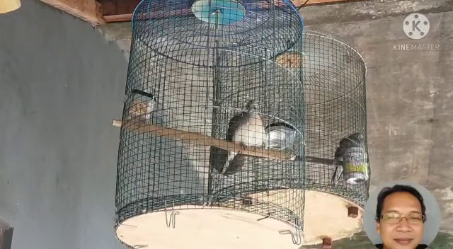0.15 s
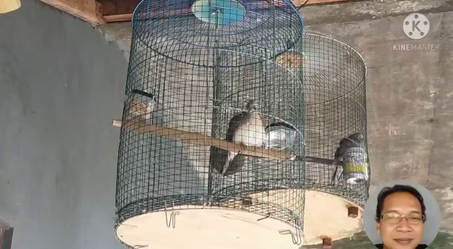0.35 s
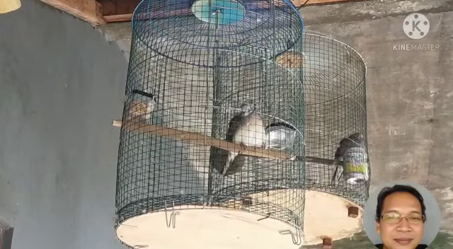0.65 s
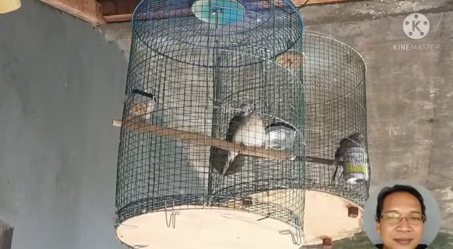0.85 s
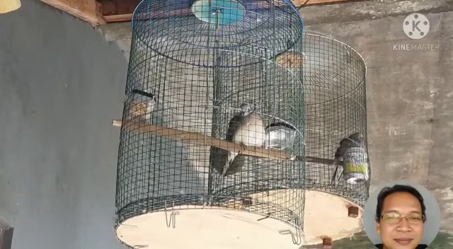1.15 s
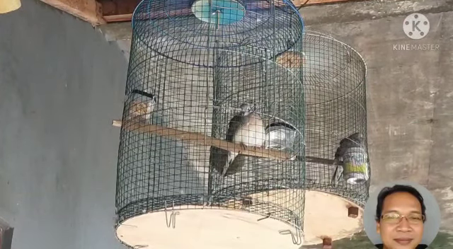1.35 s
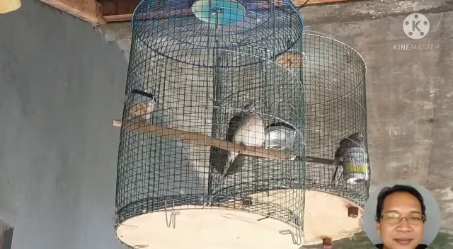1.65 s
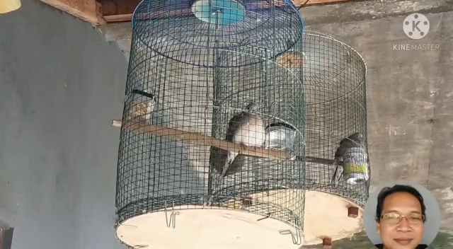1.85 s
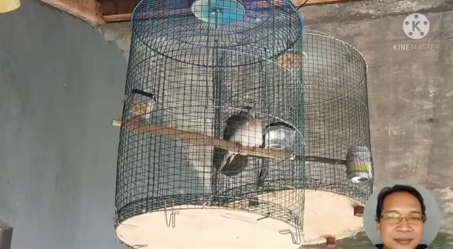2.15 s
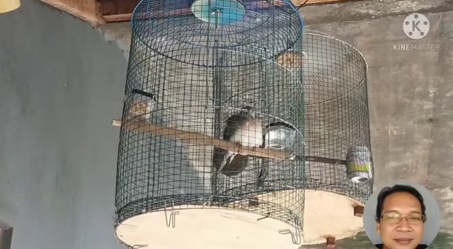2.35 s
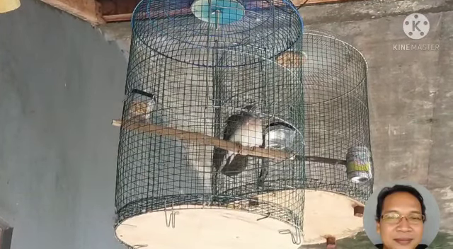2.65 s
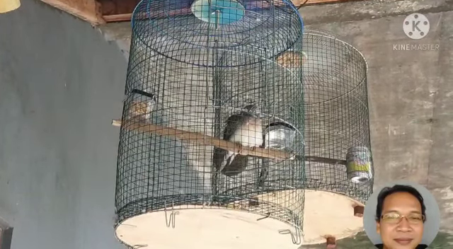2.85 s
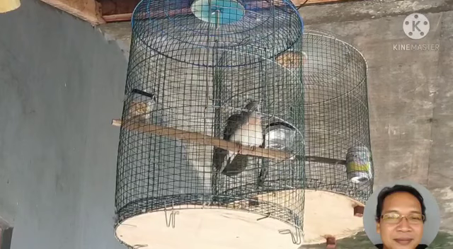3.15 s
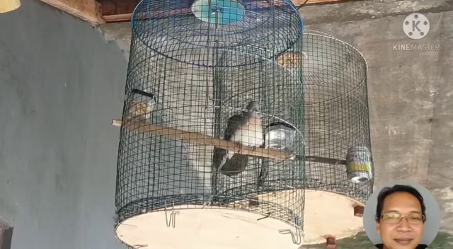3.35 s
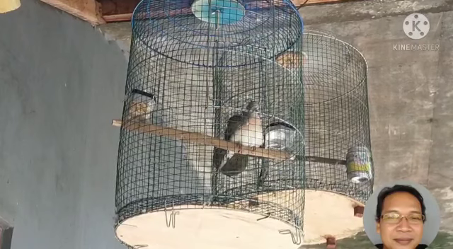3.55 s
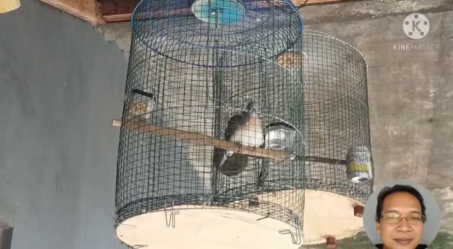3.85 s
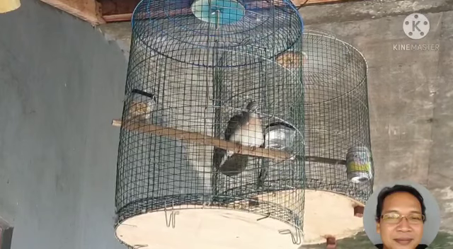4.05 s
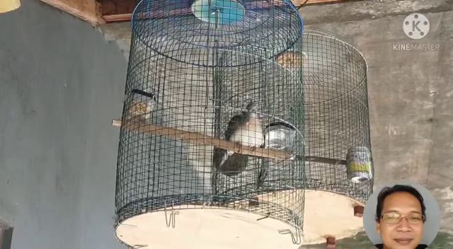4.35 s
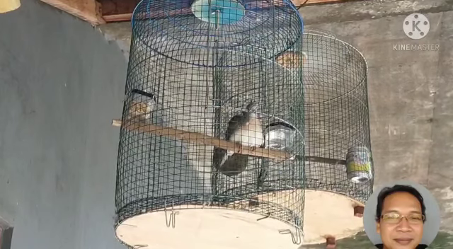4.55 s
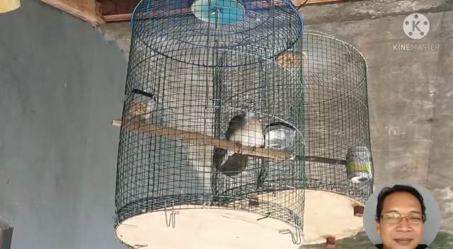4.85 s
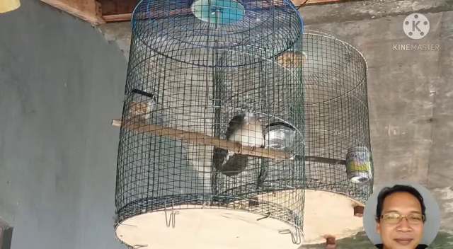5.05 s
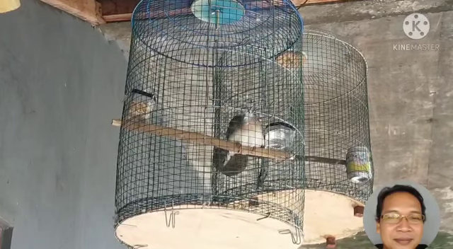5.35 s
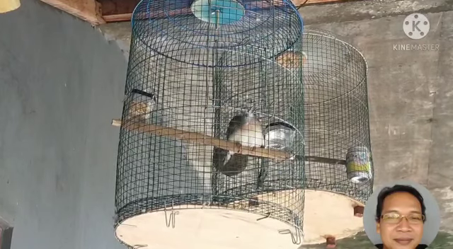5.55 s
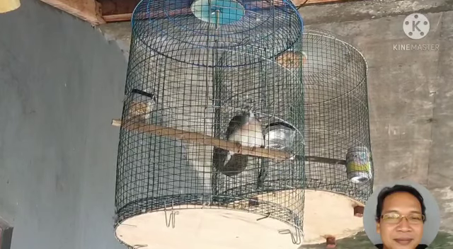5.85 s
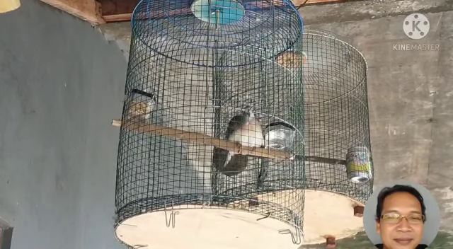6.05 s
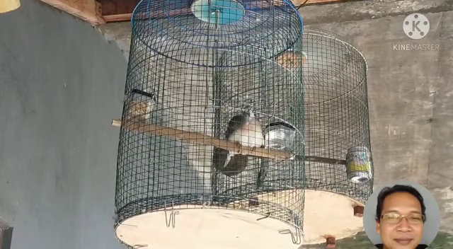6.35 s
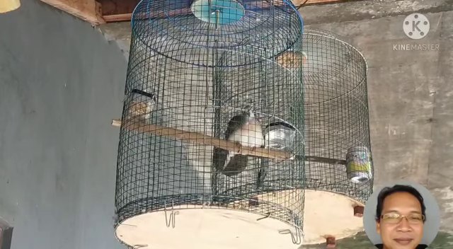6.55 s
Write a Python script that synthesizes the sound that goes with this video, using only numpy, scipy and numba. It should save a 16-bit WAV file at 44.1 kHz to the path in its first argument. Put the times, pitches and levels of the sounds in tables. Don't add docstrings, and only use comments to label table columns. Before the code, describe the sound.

A caged dove close by stutters, pauses, then sings a run of swelling coos and a fluttery flourish, over claw ticks, faint insects and low hum.

```python
import sys
import numpy as np
from scipy import signal
from scipy.fft import rfft, irfft, next_fast_len
from scipy.io import wavfile
from scipy.ndimage import uniform_filter1d
from numba import njit

SR = 44100
rng = np.random.default_rng(int(sys.argv[2]) if len(sys.argv) > 2 else 0)


def to_wav(s):
    ch = np.atleast_2d(s).T
    pcm = np.round(np.clip(ch, -1, 1) * 32767)
    wavfile.write(sys.argv[1], SR, pcm.astype(np.int16))


def ratio(d):
    e = np.asarray(d, float) / 20
    return 10 ** e


N = 295029
T = np.arange(N) / SR
CHANGE_S = 2.169


def level(x, db):
    return x * ratio(db) / np.sqrt(np.mean(x ** 2))


def shape(points, hz):
    point_hz, db = np.transpose(points)
    return ratio(np.interp(np.log(np.maximum(hz, 1)), np.log(point_hz), db))


def colour(x, points):
    size = next_fast_len(len(x), True)
    hz = np.arange(size // 2 + 1) * SR / size
    return irfft(rfft(x, size) * shape(points, hz), size)[:len(x)]


def noise(points):
    return colour(rng.standard_normal(N), points)


def walk(rate):
    hold = int(SR / rate)
    steps = np.repeat(rng.standard_normal(N // hold + 1), hold)
    return 1.3 * uniform_filter1d(uniform_filter1d(steps, hold), hold)[:N]


def wave(hz):
    return np.sin(2 * np.pi * np.cumsum(hz) / SR)


def distance(x, direct_db, t60_s):
    t = np.arange(SR // 2) / SR
    scatter = rng.standard_normal(len(t)) * ratio(-60 * t / t60_s)
    scatter /= np.sqrt(np.sum(scatter ** 2))
    scatter[0] = ratio(direct_db)
    first = T < CHANGE_S
    early = signal.fftconvolve(x * first, scatter)[:N] * first
    return early + signal.fftconvolve(x * ~first, scatter)[:N]


def arch(table, sag_hz=0, sag_hz_per_s=0, start_hz=None):
    rows = []
    for s, length, *rest in table:
        top, db = rest[-2:]
        end = top - sag_hz - sag_hz_per_s * length
        rows.append((s, length, start_hz or rest[0], top, end, db))
    return rows


def sink(table):
    return [(s, length, a, a, b, db) for s, length, a, b, db in table]


def pure(k, hz):
    return 1


# pitch_hz, level_db
POUCH = [(550, -24), (800, -6.5), (950, 6), (1100, 4.5), (1300, -5)]
# pitch_hz, level_db
THROAT = [(1600, -21.5), (1900, -24.5), (2300, -27), (3000, -27), (3400, -36.5), (3600, -25.5), (4600, -64),
          (5400, -40.5), (5800, -41.5), (6150, -28.5), (6500, -40), (6800, -51), (8000, -41.5),
          (9500, -63.5)]


def voice(k, hz):
    return shape(POUCH if k == 1 else THROAT, k * hz)


def notes(table, throat, bend, curve, swell, late, wobble, count=1, bright_db=0, growth=0.5):
    edge_s = 0.0044
    hz, gain, effort = np.full(N, 1000.), np.zeros(N), np.zeros(N)
    for s, length, start, top, end, db in table:
        on = (T >= s) & (T < s + length)
        u = (T[on] - s) / length
        rise = np.clip(1 - u / bend, 0, 1)
        fall = np.clip((u - bend) / (1 - bend), 0, 1)
        hz[on] = top - (top - start) * rise ** curve - (top - end) * fall ** curve
        effort[on] = np.abs(np.sin(np.pi * u ** late))
        edge = np.clip(np.minimum(u, 1 - u) * length / edge_s, 0, 1)
        gain[on] = ratio(db) * np.sqrt(2) * effort[on] ** swell * np.sin(np.pi / 2 * edge) ** 2
    on = gain > 0
    flicker = ratio(4.5 * walk(90))[on]
    opening = ratio(bright_db + 0 * T)[on] * (effort[on] + 0.056) ** growth * flicker
    phase = 2 * np.pi * np.cumsum(hz * (1 + wobble * walk(60)))[on] / SR
    tone = 0
    for k in range(1, count + 1):
        tone = tone + throat(k, hz[on]) * (opening if k > 1 else 1) * np.sin(k * phase)
    gain[on] *= tone
    return gain


# start_s, length_s, start_hz, top_hz, level_db
STUTTERS = [
    (-.016, 0.042, 1160, 1166, -33),
    (.024, 0.04, 1045, 1137, -31.5),
    (.064, 0.021, 1113, 1137, -32),
    (.087, 0.02, 1090, 1110, -32.5),
    (.111, 0.047, 850, 1094, -31.5),
    (.169, .011, 955, 946, -38),
    (.179, 0.0332, 850, 1064, -31.5),
    (.257, 0.094, 802, 1120, -32.5),
    (2.133, 0.012, 1041, 1055, -49.5),
    (2.147, 0.14, 787, 1186, -34.5),
]


def stutters():
    rows = arch(STUTTERS, sag_hz=24.7, sag_hz_per_s=1897)
    return notes(rows, voice, count=8, bend=0.345, curve=3, swell=0.46, late=0.75, wobble=0.00585,
                 bright_db=-2.5, growth=0.24)


# start_s, length_s, top_hz, level_db
HUMS = [(0, 0.41, 650, -71), (.41, .07, 469.2, -69), (0.511, 0.091, 636, -70.5), (.57, .13, 502.3, -69),
        (0.635, .11, 615, -72.5), (.77, 0.93, 503, -71), (0.801, .12, 615, -75), (1.533, .15, 478.8, -69.5),
        (2.069, 0.061, 660.6, -65), (2.363, .072, 415, -67), (4.399, 0.28, 642, -90),
        (4.786, 0.15, 842, -65), (5.296, 2.3, 648.5, -69), (5.05, 0.22, 854, -62)]


def hums():
    rows = [(s, length, 0.85 * hz, hz, 0.96 * hz, db) for s, length, hz, db in HUMS]
    out = sum(notes(rows[k::2], pure, bend=0.27, curve=2.2, swell=0.29, late=0.69, wobble=0.0026)
              for k in range(2))
    return ratio(-9.5) * distance(out, direct_db=8, t60_s=0.45)


def air(points, db):
    out = 0
    for hz in 22 * 2. ** np.arange(10):
        band = noise([(hz / 2, -60), (hz / 1.6, -6), (hz, 0), (hz * 1.6, -6), (hz * 2, -60)])
        out = out + band * ratio(0.68 * walk(2.185) + 2.1 * walk(14))
    out = out + noise([(11000, -60), (15000, -2), (20000, 0)])
    return level(colour(out, points), db)


# time_s, level_db
RUSTLE = [(0.0, -70), (0.2, -62), (0.26, -65.5), (0.57, -70.5), (0.709, -69.5), (0.88, -73.5), (1.74, -84),
          (1.94, -95), (2.16, -91)]


def rustle():
    s, db = np.transpose(RUSTLE)
    hiss = noise([(9000, -10.5), (12500, -15.5), (14800, -1), (15400, -15.5), (16200, -36.5)])
    return level(hiss, -4.5) * ratio(np.interp(T, s, db) + 2.0 * walk(58))


# pitch_hz, level_db
ENGINES = [(53, -70), (79, -67.5), (127, -67.5)]


def drones():
    return sum(ratio(db + 4.0 * walk(6.7)) * wave(hz * (1 + 0.067 * walk(2.0))) for hz, db in ENGINES)


# (under 9 kHz, against the peak)
TICKS = [(0.108, -61, -20), (0.149, -45, -7.5), (0.169, -49, -10), (0.2, -45, -3.5), (0.2364, -35.5, -10),
         (0.507, -39.5, -18), (0.5593, -46, -12), (0.621, -47.5, -8.5), (0.7188, -41, -22),
         (0.771, -40.5, -11), (0.8425, -53, -7), (0.877, -57, -1), (0.954, -53, -2), (1.231, -48.5, -5),
         (1.4793, -65, -2), (1.616, -52.5, -9), (1.7213, -66, -12), (1.7497, -60, -8), (1.8593, -57, -13),
         (1.982, -47, -10), (2.154, -60, -17.5),
         (2.326, -43, -1), (2.5094, -58.5, -3.5), (2.708, -48, -15), (2.7364, -57, -8),
               (3.3799, -17.5, -10.5), (3.3855, -38, 5), (3.487, -35, -11), (4.002, -36.5, -2.5),
               (4.469, -43, -6), (4.6487, -43, 3.5), (4.741, -32.5, -15.5), (4.771, -42.5, 4),
               (5.3825, -40.5, -2), (5.938, -52, -9), (6.4394, -48, 1), (6.479, -44, -11)]


def ticks():
    t = np.arange(SR // 20) / SR
    tail = np.exp(-t / .0011) + ratio(-22) * np.exp(-t / .01)
    bright, dull = np.zeros(N + len(t)), np.zeros(N + len(t))
    for s, db, dull_db in TICKS:
        i = int(s * SR)
        crack = tail * rng.standard_normal(len(t))
        crack *= ratio(db + 4.0) / np.sqrt(np.sum(crack ** 2) / np.sum(tail ** 2))
        bright[i:i + len(t)] += crack
        dull[i:i + len(t)] += crack * ratio(dull_db)
    top = colour(bright[:N], [(8000, -24.5), (11000, -12.5), (14000, -3.5), (15100, 12.5), (15600, -11.5),
                              (16300, -20.5), (16600, -56.5)])
    return top + colour(dull[:N], [(1500, -13.5), (4000, -18), (6000, -12.5), (8200, 0.5), (10000, -16.5),
                                   (12000, -28.0)])


# middle_s, half_length_s, pitch_hz, level_db
RUMBLES = [
    (0.209, 0.46, 136.2, -60.5),
    (1.152, 0.17, 140, -61.5),
    (5.8, .15, 79.2, -58),
    (6.35, 0.27, 79, -56.5),
]


def rumbles():
    out = 0
    for s, half, hz, db in RUMBLES:
        swell = ratio(db + 2.4 * walk(13)) * np.exp(-((T - s) / half) ** 2)
        out = out + swell * wave(hz * (1 + 0.0503 * walk(8)))
    return out


# start_s, length_s, top_hz, level_db
FAR_COOS = [
    (1.003, 0.16, 1219, -53),
    (1.889, .16, 1194, -57),
    (2.391, .17, 1358, -47),
    (2.555, 0.04, 1214, -53),
]
# start_s, length_s, from_hz, to_hz, level_db
FAR_SINKING = [
    (1.16, 0.08, 995, 970, -63),
    (1.355, 0.31, 1042, 905, -71.5),
    (2.385, 0.021, 1540, 1450, -58),
]


def far_doves():
    start_hz = 959
    coos = notes(arch(FAR_COOS, sag_hz=170.9, start_hz=start_hz), pure, bend=0.1353, curve=1.4,
                 swell=0.17, late=0.2, wobble=0.00924)
    lead_in = [(s, 0.03225, start_hz, 0.68 * top, 0.68 * top, db - 2.5) for s, _, top, db in FAR_COOS[:-1]]
    lead_in = notes(lead_in, pure, bend=0.56, curve=0.93, swell=0.29, late=0.8, wobble=0.0084)
    trail = notes(sink(FAR_SINKING), pure, bend=.05, curve=1.2, swell=0.25, late=0.4, wobble=.008)
    return ratio(4.5) * distance(coos + lead_in + trail, direct_db=-9, t60_s=0.45)


# start_s, length_s, from_hz, to_hz, level_db
WHISTLES = [
    (1.25, 0.39, 3385, 2994, -72),
    (1.75, 0.12, 3524, 3430, -71),
    (2.505, 0.028, 2444, 2113, -52),
    (6.25, 0.54, 2765, 2670, -65.5),
]


def whistles():
    out = notes(sink(WHISTLES), pure, bend=.2, curve=1.2, swell=.5, late=1, wobble=0.004)
    return ratio(4.5 - 11) * distance(out, direct_db=-9, t60_s=0.45)


# pitch_hz, level_db
CHORUS = [(10000, -70), (11800, -32), (12500, -17), (13100, -11), (13400, -6), (13680, 0), (13950, -6),
          (14300, -12), (15150, -15), (15300, -28), (15550, -60)]
# first_crest_s, phrase_period_s, crest_hz, wing_stroke_hz
SINGERS = [
    (.55, 1.975, 13362, 270),
    (.55, 1.9, 13755, 300),
    (1.52, 1.83, 13860, 245),
]
# time_from_crest_s, offset_from_crest_hz
PHRASES = [
    [(-.73, -110), (0, 0), (1.3, -210)],
    [(-.9, -160), (0, 0), (.97, -255), (1.32, -210)],
    [(-.66, -170), (0, 0), (.55, -155), (1.3, -300)],
]
# line_db; sidebands one below, one above, two above (db against line); undertones_db
SINGER_DB = [(-49, -19, -3.5, -12, -52.5), (-41, -10.5, -17, -21.5, -48.5), (-43.5, -17, -10, -19, -50)]
# share_of_main_pitch, level_db; the last row is the main line itself
UNDERTONES = [(1 / 4, -14.5), (1 / 3, -29.5), (1 / 2, -21), (3 / 4, -28), (1, 0)]
# time_s, pitch_hz, level_db
RASP = [
    (4.25, 13830, -56),
    (4.33, 13830, -43),
    (4.55, 13690, -39),
    (4.8, 13200, -42),
    (4.9, 13140, -56),
]


def insects():
    out = level(noise(CHORUS), -50.5) * ratio(1.2 * walk(6))
    for (crest, period, top, stroke), phrase, (db, *sides, under_db) in zip(SINGERS, PHRASES, SINGER_DB):
        after, bend = np.transpose(phrase)
        for k in range(4):
            s = crest + period * k + after
            on = (T > max(s[0], CHANGE_S)) & (T < s[-1])
            pitch = uniform_filter1d(np.interp(T, s, top + bend), size=SR // 6)
            clean = 2 * np.pi * np.cumsum((pitch + 7 * walk(30))[on]) / SR
            phase = 2 * np.pi * np.cumsum((pitch + 9 * walk(30))[on]) / SR
            fade = np.clip(np.minimum(T - s[0], s[-1] - T) / .1, 0, 1)[on]
            line = np.sin(phase) * ratio(4.5 * walk(28))[on]
            for order, side_db in zip((-1, 1, 2), sides):
                side = np.sin(phase + 2 * np.pi * order * stroke * T[on])
                line = line + ratio(side_db + 4 * walk(28))[on] * side
            under = sum(ratio(d) * np.sin(share * clean) for share, d in UNDERTONES[:-1])
            under = under * ratio(4 * walk(20))[on]
            out[on] += fade * (ratio(db) * line + ratio(under_db) * under)
    s, hz, db = np.transpose(RASP)
    rasp = walk(240) * wave(np.interp(T, s, hz))
    return out + ratio(np.interp(T, s, db, left=-120, right=-120)) * rasp


# start_s, length_s, start_hz, top_hz, level_db
OPENING = [
    (3.10, 0.17, 558.5, 1176, -28),
]
FLARE = [
    (3.108, 0.0407, 1106, 1885, -45.5),
]
SCOOP = [
    (3.108, 0.06, 556, 980, -48.5),
]


def opening_call():
    call = notes(arch(OPENING), voice, count=8, bend=0.92, curve=2.2, swell=0.67, late=4.9, wobble=0.0025,
                 bright_db=-5)
    flare = notes(arch(FLARE), pure, bend=0.96, curve=0.94, swell=0.33, late=0.29, wobble=0.0077)
    scoop = notes(arch(SCOOP), pure, bend=0.8, curve=1.17, swell=0.26, late=2.1, wobble=0.00355)
    return call + flare + scoop


# middle_s, half_length_s, level_db
PASSING = (3.3, 0.27, -54.5)


def passing():
    s, half, db = PASSING
    road = noise([(150, -27), (300, -16.0), (600, -5.5), (900, 4.0), (1600, -1.0), (2200, -29)])
    return level(road, db) * np.exp(-((T - s) / half) ** 2)


# pitch_hz, level_db
COO_POUCH = [(700, -16), (920, -9), (1030, -13), (1105, 1), (1300, 0)]


def round_voice(k, hz):
    return shape(COO_POUCH if k == 1 else THROAT, k * hz)


# start_s, length_s, top_hz, level_db
COOS = [(3.335, 0.031, 1070, -32), (3.39, .04, 1117, -39.5), (3.452, 0.041, 1079, -32.5),
        (3.525, 0.042, 1144, -37), (3.605, 0.044, 1118, -35), (3.7, 0.037, 1155, -28),
        (3.80, .11, 1181, -28), (4.0, 0.13, 1160, -28), (4.21, .15, 1142, -31), (4.435, 0.15, 1134, -31.5),
        (4.668, 0.17, 1118, -33), (4.915, 0.16, 1120, -34), (5.155, 0.17, 1115, -34)]
# time_s, overtones_db
COO_OPENING = [(3.75, -11), (3.85, -7), (4.1, -9), (4.45, -3), (5.3, -2)]


def coos():
    return notes(arch(COOS, sag_hz=56.6, start_hz=844), round_voice, count=8, bend=0.44, curve=2.5,
                 swell=0.42, late=0.93, wobble=0.00207,
                 bright_db=np.interp(T, *np.transpose(COO_OPENING)), growth=-0.19)


# start_s, length_s, start_hz, top_hz, level_db
NEIGHBOUR = [
    (3.42, 0.1225, 1171, 1377, -39),
    (3.53, .056, 1195, 1261, -34.5),
]


def neighbour():
    return notes(arch(NEIGHBOUR, sag_hz_per_s=1500), pure, bend=.35, curve=1.703, swell=0.22, late=0.48,
                 wobble=0.0055)


# time_s, level_db
CHEEP_EFFORT = [(3.64, -77), (3.85, -71.5), (4.3, -67.5), (5.2, -68.5), (5.8, -69.5), (6.15, -68)]
# start_s, level_db
CHEEPS_DOWN = [(4.392, -60), (4.63, -61), (4.871, -63.5), (5.47, -62), (5.88, -64), (6.441, -66.5)]


def cheeps():
    beats = 3.645 + .1925 * np.arange(14)
    effort_db = np.interp(beats, *np.transpose(CHEEP_EFFORT))
    up = [(s, .055, 2350, 3750, 3700, db + 15.5) for s, db in zip(beats, effort_db)]
    up = notes(up, pure, bend=0.87, curve=0.87, swell=0.13, late=1, wobble=0.01198)
    down = [(s, .11, 5500, 5550, 3400, db + 5.0) for s, db in CHEEPS_DOWN]
    down = notes(down, pure, bend=0.031, curve=0.64, swell=0.21, late=1, wobble=0.01265)
    return distance(up + down, direct_db=-24, t60_s=1.05)


# start_s, length_s, start_hz, top_hz, level_db
FLOURISH = [
    (5.346, 0.023, 695, 796, -47),
    (5.368, 0.058, 799, 1215, -33.5),
    (5.428, .038, 1105, 1183, -33.5),
    (5.467, 0.04, 1033, 1150, -33),
    (5.522, 0.041, 876, 1083, -34.5),
    (5.591, 0.031, 843, 1070, -34.5),
    (5.652, 0.0244, 856, 993, -41.5),
    (5.677, 0.11, 850, 1163, -35),
    (5.864, 0.1, 813, 1177, -36.5),
]


def flourish():
    flutter = 1 + .42 * wave(72 * (1 + .2 * walk(30)))
    rows = arch(FLOURISH, sag_hz=15.2, sag_hz_per_s=2400)
    return flutter * notes(rows, voice, count=8, bend=.46, curve=2.5, swell=0.39, late=0.85,
                           wobble=0.0035, bright_db=7.0)


@njit
def walls(x, lags, gain, damp):
    line, soft, out = np.zeros((8, 4096)), np.zeros(8), np.zeros(len(x))
    for i in range(len(x)):
        total = 0.
        for k in range(8):
            soft[k] += (1 - damp) * (gain[k] * line[k, (i - lags[k]) & 4095] - soft[k])
            total += soft[k]
            out[i] += soft[k] * (1 - 2 * (k % 2))
        for k in range(8):
            line[k, i & 4095] = x[i] + 1e-18 + soft[k] - total / 4
    return out


# delay_s, level_db
ECHOES = [(0.0125, -9), (.03125, -9), (0.059, -17), (0.088, -12)]


def yard_ring(sent, wet_db, scale):
    lags = np.array([709, 953, 1237, 1531, 1823, 2179, 2549, 2903])
    ring = walls(sent, lags, ratio(-60 * lags / SR / 0.48), 0.09)
    echoes = sum(ratio(db + wet_db / 2) * np.interp(T - s * scale, T, sent, left=0) for s, db in ECHOES)
    return ratio(-13.5) * ring + echoes


# pitch_hz, level_db (per Hz)
YARD = [(12, -35), (20, -9), (49, 3), (130, -1.5), (187, -6), (422, -18.5), (499, -21), (558, -18),
        (607, -18.5), (2080, -17.5), (5530, -37), (7950, -32.5), (11100, -42.5), (14700, -30), (16000, -49)]
YARD_LATER = [(12, -35), (20, 3), (63, -6), (145, -6.5), (222, -17), (500, -18.5), (2000, -18.5),
              (3300, -21), (4400, -23.5), (5200, -35.5), (6100, -31.5), (8000, -25.5), (9300, -32),
              (12000, -31)]
# time_s, level_db
FADE_IN = [(2.175, -82), (2.19, -34.5), (2.283, -28), (2.31, -3.5)]
WET_DB = [-6, -1]
WALL_SCALE = [.96, 1]


def scene():
    near = stutters() + opening_call() + coos() + neighbour() + flourish()
    far = hums() + far_doves() + whistles() + cheeps()
    tick = ticks()
    parts = []
    for on, wet_db, scale in zip((T < CHANGE_S, T > FADE_IN[-1][0]), WET_DB, WALL_SCALE):
        sent = (near + ratio(-13) * tick) * on * ratio(wet_db)
        parts.append((near + far + tick) * on + yard_ring(sent, wet_db, scale))
    swells = rumbles()
    first = parts[0] + air(YARD, -62.5) + rustle() + drones() + swells
    later_air = air(YARD_LATER + [(15000, -49), (23000, -120)], -58)
    later = parts[1] + later_air + insects() + drones() + passing() + swells
    first[int(CHANGE_S * SR) - 1:] += ratio(-50)
    s, db = np.transpose(FADE_IN)
    return (first * (T < CHANGE_S) + later * ratio(np.interp(T, s, db, left=-120)))[None]


def roll_off(x):
    return signal.sosfilt(signal.butter(12, 16500, fs=SR, output="sos"), x)


def record(dry):
    return roll_off(dry)


dry = scene()
out = record(dry)
to_wav(out)
```